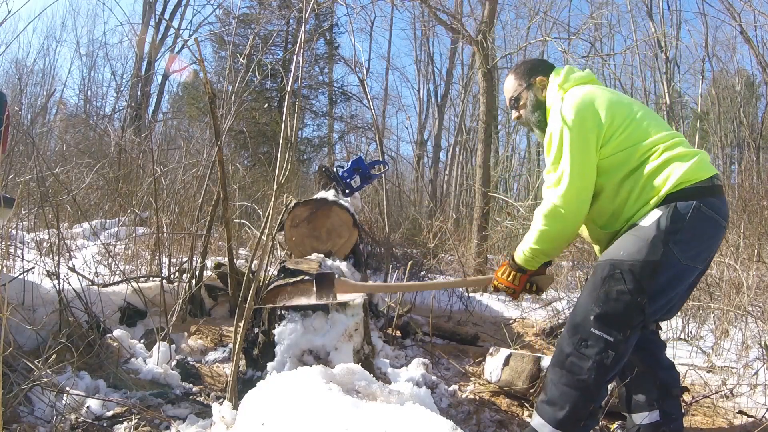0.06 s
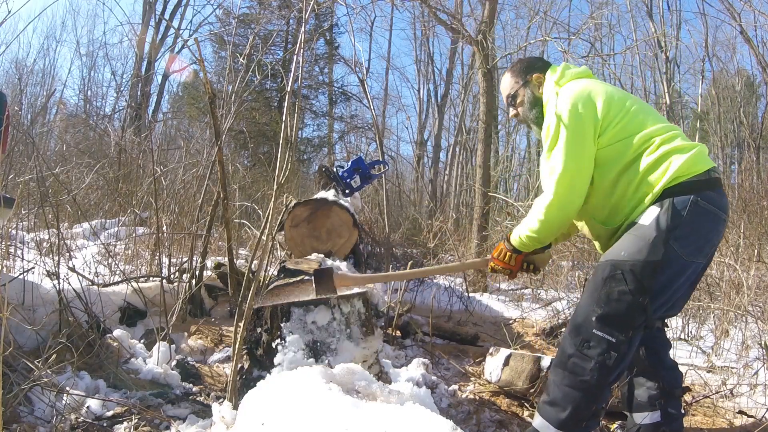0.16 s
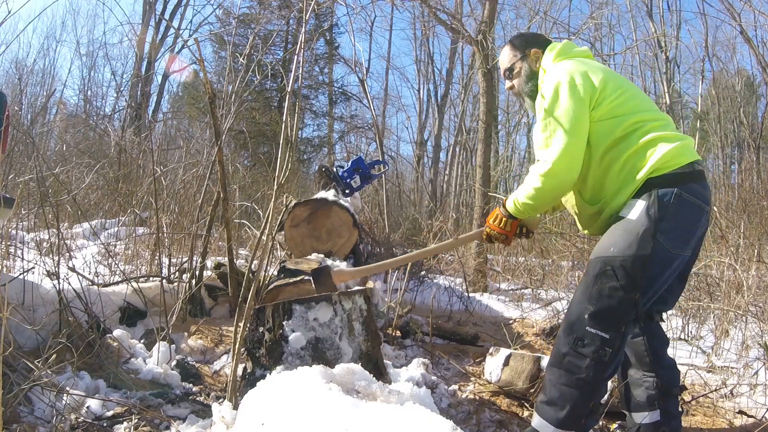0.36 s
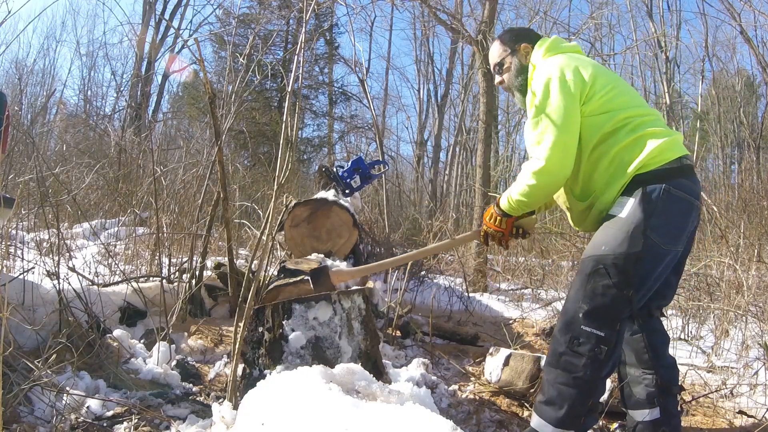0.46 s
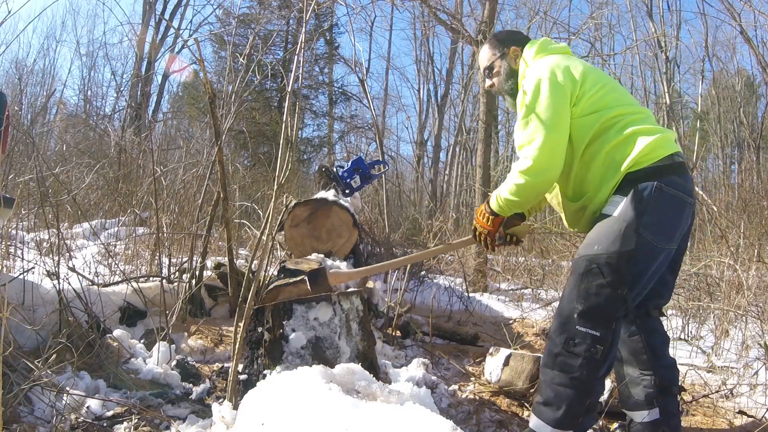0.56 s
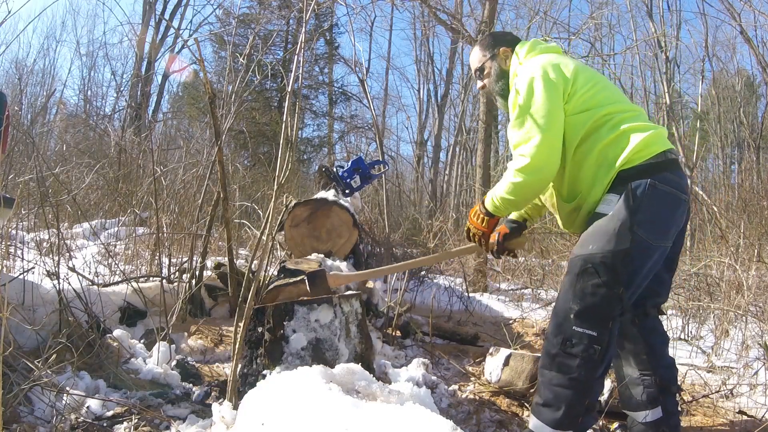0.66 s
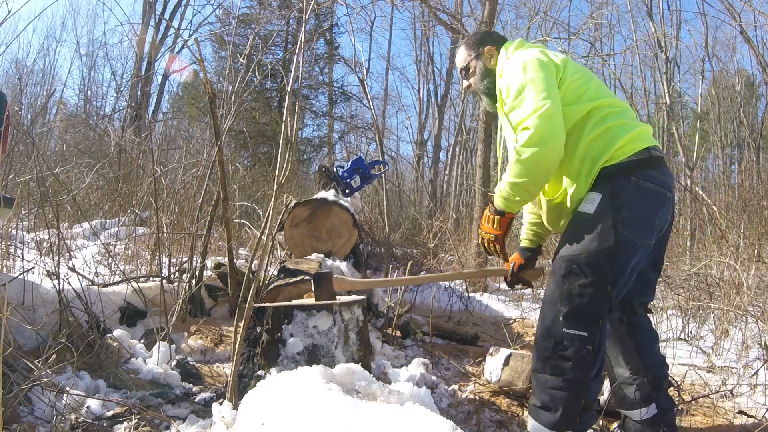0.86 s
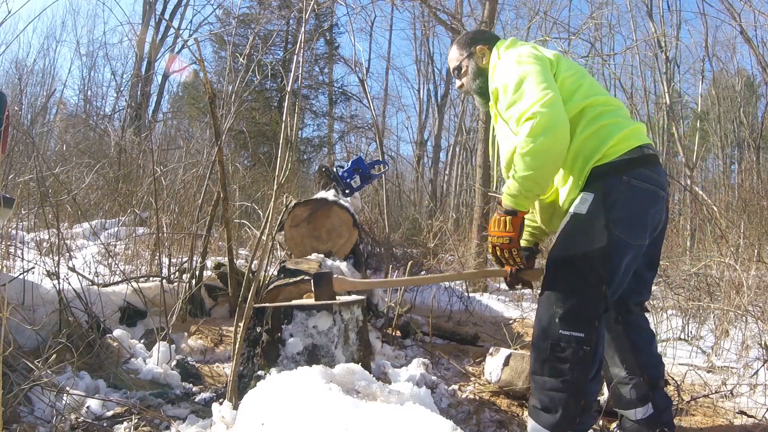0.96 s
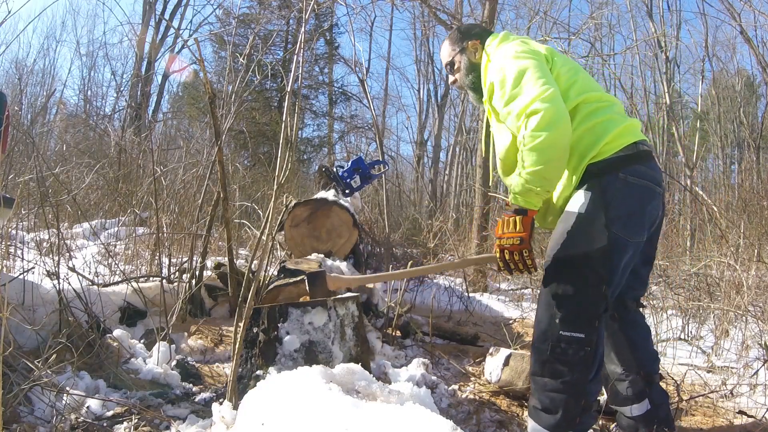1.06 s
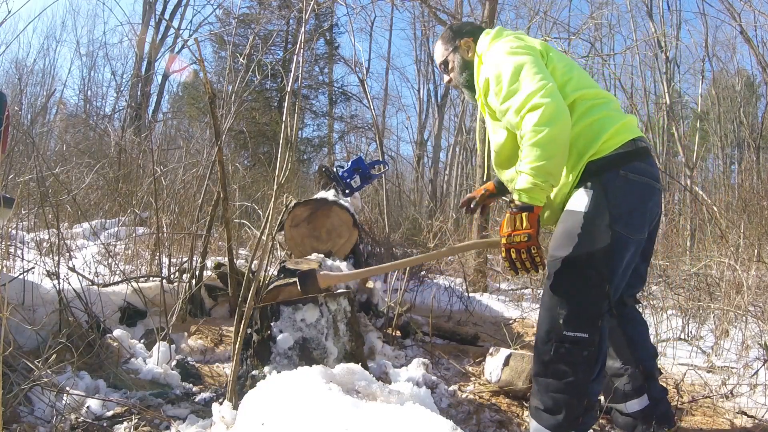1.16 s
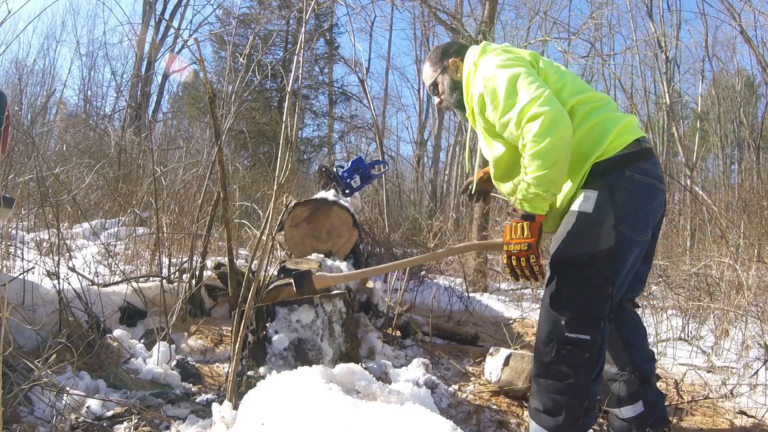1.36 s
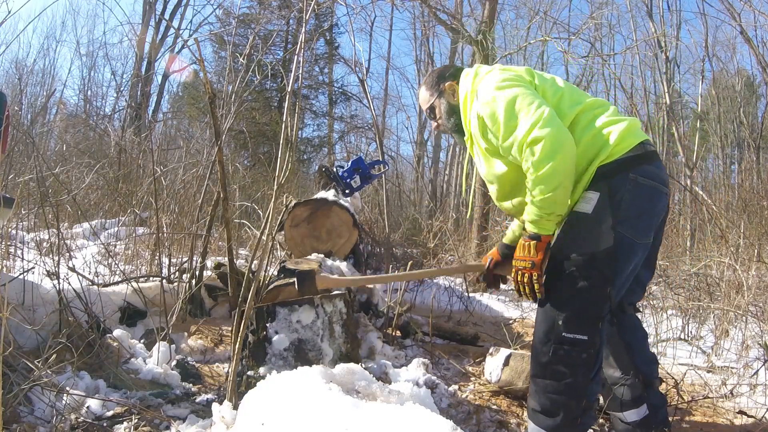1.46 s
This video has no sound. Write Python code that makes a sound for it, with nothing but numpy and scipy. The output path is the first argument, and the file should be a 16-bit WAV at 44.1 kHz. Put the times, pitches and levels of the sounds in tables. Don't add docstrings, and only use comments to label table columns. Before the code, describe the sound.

A single heavy axe chop overloads the microphone a few metres away in a quiet snowy wood, followed by a short ragged echo, scattered clicks, woody knocks, a low handle scrape, soft cloth movement, faint rumble and hiss.

```python
import sys
import numpy as np
from scipy import signal
from scipy.fft import rfft, irfft
from scipy.io import wavfile
from scipy.ndimage import uniform_filter1d

SR = 44100
rng = np.random.default_rng(int(sys.argv[2]) if len(sys.argv) > 2 else 0)


def invert_db(x):
    u = np.asarray(x, float) / 20
    return 10 ** u


def to_wav(s):
    ch = np.atleast_2d(s).T
    pcm = np.round(np.clip(ch, -1, 1) * 32767)
    wavfile.write(sys.argv[1], SR, pcm.astype(np.int16))


N = 66150
T = np.arange(N) / SR

CHOP_S = 0.1343
PORT_HZ = 6450

# frequency in Hz, level in dB per Hz.
HISS_COLOUR = [(100, 0), (500, -11.5), (900, -12), (3000, -20.5), (5000, -26.5), (6800, -17.5), (9600, -25),
               (11000, -28.5)]
# time in seconds, level in dB.
RUMBLE_SWELL = [(0, -1.5), (.1, 3.5), (.25, 4), (.42, -1.5), (.6, 0), (.66, -1), (.8, 3), (.93, 2),
                (.99, -1.5), (1.05, 1.5), (1.2, -3.5), (1.35, 5), (1.5, -4)]
# frequency in Hz, time to fall 60 dB in seconds.
ECHO_FADE = [(100, 0.096), (400, 0.21), (1000, 1), (2500, 0.55), (6000, 0.34), (12000, 0.16)]
# frequency in Hz, level in dB per Hz.
ECHO_COLOUR = [(150, -5), (300, 12.5), (600, -2), (950, 0), (1500, -8), (4000, -10.5), (6400, -11.5),
               (12000, -44)]
# time in seconds, level in dB.
RUSTLE_LEVEL = [(0, -72), (.1, -47.5), (.4, -46), (.56, -96), (.6, -48), (.76, -43.5), (.82, -52),
                (.9, -50.5), (1.04, -75), (1.12, -46), (1.17, -47), (1.3, -42.5), (1.385, -45),
                (1.41, -52.5), (1.5, -65)]
# frequency in Hz, level in dB per Hz.
CLOTH_COLOUR = [(250, 6), (500, -2.5), (1400, -1), (2800, -1), (4000, -7.5), (6400, -6), (9000, -11),
                (13000, -70)]
# time in seconds, level in dB.
SCRAPE_LEVEL = [
    (.56, -54),
    (.6, -37.5),
    (.64, -41),
    (.7, -38),
    (.75, -45),
    (.81, -48.5),
    (.9, -50),
    (.95, -59),
]
CHIP_TIMES = [.193, .2575, .3146, .387, .460, .5795, .583, .654, .6562, .660, .6995, .7262, .797, .800,
              .8938, 1.177, 1.2135, 1.353, 1.3885]
# peak in dB, low edge in Hz, high edge in Hz, length in seconds.
CHIP_SOUNDS = [(-33, 380, 4500, 0.012), (-34, 4400, 6200, .006), (-22, 1200, 8000, 0.0088),
               (-31.5, 1400, 7200, 0.02), (-35, 5000, 7700, 0.002), (-25.5, 550, 7300, 0.035),
               (-20.5, 1000, 7600, 0.0021), (-27, 1400, 7500, 0.032), (-20, 860, 6900, 0.0061),
               (-35, 5700, 7000, 0.01), (-24, 1230, 2800, 0.012), (-30.5, 2000, 2950, 0.0048),
               (-24.5, 355, 1870, 0.02), (-35.5, 1000, 3300, 0.013), (-29.5, 1500, 8300, .004),
               (-36.5, 1000, 1600, 0.011), (-39, 3400, 6500, 0.003), (-35, 560, 1900, 0.017),
               (-25.5, 1070, 2800, 0.0092)]
# start in seconds, peak in dB, pitch in Hz,
# time to fall 60 dB in seconds.
KNOCK_EVENTS = [(0.317, -24.5, 870, 0.038), (0.326, -25, 150, 0.11), (0.581, -25.5, 513, 0.031),
                (0.614, -40, 301, 0.12), (.640, -39, 255, 0.068), (0.6909, -16, 512, 0.018),
                (0.697, -30, 716, .03), (.704, -22, 288, 0.035), (0.7229, -24.5, 713, 0.062),
                (.731, -47, 520, .03), (0.8, -26.5, 620, 0.041), (0.804, -33, 337, 0.035),
                (1.182, -31, 466, 0.066), (1.347, -26.5, 231, 0.036), (0.284, -28.5, 277, 0.026),
                (1.483, -33, 179, 0.043), (.002, -37.5, 321, 0.067), (0.393, -31.5, 120, 0.036),
                (.797, -26.5, 150, 0.077), (1.189, -27.5, 114, 0.089), (1.351, -43, 131, 0.049)]
# pitch as a multiple of the knock's own, and level in dB.
KNOCK_PARTIALS = [1.043, 0.66, 1.59, 2.24]
KNOCK_PARTIAL_DB = [2.5, -5, -3, -7]
# frequency in Hz, level in dB per Hz.
TEAR_COLOUR = [(290, -8.5), (500, -2), (1020, 0.5), (4400, -9), (6330, -6), (8580, -62), (13400, -52),
               (16000, -41)]
# pitch in Hz, level in dB,
# time to fall 60 dB in seconds, rise time in seconds.
LOG_MODES = [(108.5, -0.5, 0.094, 0.0071), (131.6, 16, 0.06, 0.0037), (156.6, -3.5, 0.13, 0.0052),
             (263.3, 8, 0.06, 0.015), (358, 14, 0.029, 0.0018), (429, 6.5, 0.022, 0.0012),
             (623.5, 5, 0.054, 0.0053), (691.5, -3, 0.058, 0.0016), (840.7, 16, 0.027, 0.00098),
             (928, 9, 0.026, 0.00075), (956, -35, 0.05, 0.00058), (1317, 0, 0.044, 0.00033),
             (1540, -12, 0.062, .001), (1854, 5, 0.034, 0.0014), (2183, 0, 0.037, 0.003)]
# time in seconds, gain in dB.
LEVELLING = [
    (0, 7.5),
    (.102, 2.5),
    (.105, -12),
    (.13, 0),
    (.2, -5),
    (.5, -1.5),
    (1, -1),
    (1.5, -0.5),
]


def evened(x):
    return x / np.sqrt(np.mean(x ** 2) + 1e-20)


def curve(points):
    return invert_db(np.interp(T, *np.transpose(points)))


def read(points, hz):
    f, value = np.transpose(points)
    return np.interp(np.log(hz + 1), np.log(f + 1), value)


def colour(x, points):
    hz = np.fft.rfftfreq(len(x), 1 / SR)
    return evened(irfft(rfft(x) * invert_db(read(points, hz)), len(x)))


def resonate(x, hz, width):
    r = np.exp(-np.pi * width / SR)
    a = [1, -2 * r * np.cos(2 * np.pi * hz / SR), r * r]
    once = signal.lfilter([1], a, x)
    return evened(signal.lfilter([1, 0, -1], a, once))


def grit(per_s, spread_db):
    size = invert_db(spread_db * np.minimum(rng.exponential(1, N), 4))
    happens = rng.random(N) < per_s / SR
    return evened(size * rng.standard_normal(N) * happens)


def since(s):
    return np.maximum(T - s, 0)


def hiss():
    noise, air = rng.standard_normal((2, N))
    noise = signal.oaconvolve(colour(noise, HISS_COLOUR), signal.firwin(255, 14000, fs=SR), "same")
    return invert_db(-44) * noise + invert_db(-55.5) * resonate(air, PORT_HZ, width=330)


def rumble():
    low, upper = rng.standard_normal((2, N))
    deep = invert_db(-37) * resonate(low, hz=46, width=27)
    hum = invert_db(-53.5) * resonate(upper, hz=150, width=95)
    return curve(RUMBLE_SWELL) * (deep + hum)


def trees():
    hz, t, z = signal.stft(colour(rng.standard_normal(N), ECHO_COLOUR), SR, nperseg=256)
    fade = invert_db(-60 * np.maximum(t - CHOP_S, 0) / read(ECHO_FADE, hz)[:, None])
    tail = signal.istft(z * fade, SR, nperseg=256)[1][:N]
    ragged = invert_db(2.5 * evened(uniform_filter1d(rng.standard_normal(N), 150)))
    rise = np.minimum(since(CHOP_S) / 0.0035, 1)
    return invert_db(-23) * tail * ragged * rise


def jacket():
    flicker = invert_db(2.0 * evened(uniform_filter1d(rng.standard_normal(N), 400)))
    slips = grit(per_s=20000, spread_db=1.5)
    return colour(slips, CLOTH_COLOUR) * curve(RUSTLE_LEVEL) * flicker


def handle():
    moving = (T > SCRAPE_LEVEL[0][0]) * (T < SCRAPE_LEVEL[-1][0])
    scrape = resonate(grit(per_s=2500, spread_db=3.0), hz=296, width=870)
    return scrape * curve(SCRAPE_LEVEL) * moving


def chips():
    tilt_hz, snap_size = 2470, 3.06
    out, noise = np.zeros(N), rng.standard_normal(N)
    for s, (db, low_hz, high_hz, length) in zip(CHIP_TIMES, CHIP_SOUNDS):
        t = since(s)
        crumble = invert_db(-26 * t / length) * np.minimum(t / 0.00074, 1) * noise
        snap = snap_size * np.exp(-((T - s - 0.0006) * SR) ** 2 / 2)
        band_filter = signal.butter(4, [low_hz, high_hz], "bandpass", fs=SR, output="sos")
        band = signal.sosfilt(band_filter, crumble + snap)
        band = signal.lfilter([1], [1, -np.exp(-2 * np.pi * tilt_hz / SR)], band)
        out += invert_db(db) * band / abs(band).max()
    return out


def knocks():
    out, draw = np.zeros(N), rng.random((len(KNOCK_EVENTS), 8))
    for (s, db, hz, t60), d in zip(KNOCK_EVENTS, draw):
        t = since(s)
        rise = np.minimum(t / 0.0015, 1)
        for k, (ratio, part_db) in enumerate(zip(KNOCK_PARTIALS, KNOCK_PARTIAL_DB)):
            f = hz * ratio * (0.913 + 0.12 * d[k])
            fade = invert_db(db + part_db - 4.5 - 60 * t * np.sqrt(ratio) / t60)
            out += fade * rise * np.sin(2 * np.pi * (f * t + d[k + 4]))
    return out


def ground():
    hz, level_db, t60_s = 43.7, -6.5, 0.11
    t = since(0.164)
    rise = 1 - np.exp(-t / 0.0031)
    return -invert_db(level_db - 60 * t / t60_s) * rise * np.sin(2 * np.pi * hz * t)


def chop():
    t = since(CHOP_S)
    ring = np.zeros(N)
    for hz, db, t60, rise in LOG_MODES:
        swell = (1 - np.exp(-t / rise)) ** 2
        ring += invert_db(db - 60 * t / t60) * swell * np.sin(2 * np.pi * hz * t)
    fibres = colour(grit(per_s=6600, spread_db=1.2), TEAR_COLOUR)
    touch = invert_db(-29) * np.clip(since(0.1288) / 0.0035, 0, 1) * (T < CHOP_S)
    tear = invert_db(7.5 - 60 * t / 0.03) * np.minimum(t / 0.002, 1)
    return ring + fibres * (touch + tear)


def scene():
    near = trees() + jacket() + handle() + chips() + knocks() + ground() + chop()
    near = near + 0.97 * signal.lfilter(*signal.iirpeak(PORT_HZ, 6.0, fs=SR), near)
    dulled = signal.sosfilt(signal.butter(4, 9700, fs=SR, output="sos"), near)
    return (dulled + hiss() + rumble())[None]


def top_cut(x):
    return signal.sosfilt(signal.butter(12, 16250, fs=SR, output="sos"), x)


def record(dry):
    hot = np.clip(dry * curve(LEVELLING), -1, 1)
    soft = signal.oaconvolve(hot, signal.firwin(63, 15800, fs=SR)[None], "same")
    return top_cut(np.clip(soft, -1, 1))


dry = scene()
out = record(dry)
to_wav(out)
```